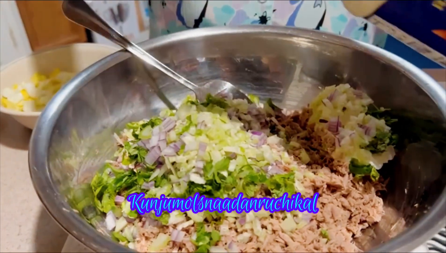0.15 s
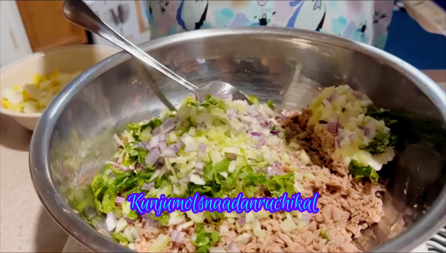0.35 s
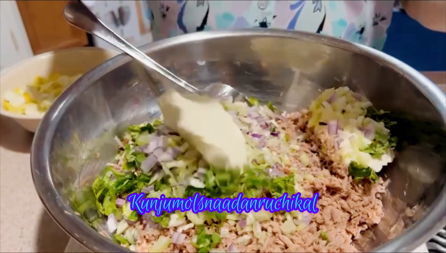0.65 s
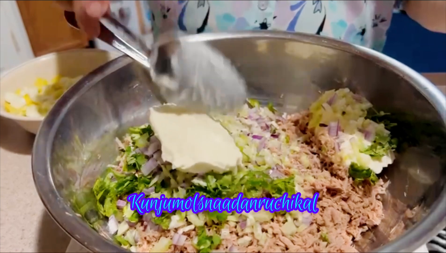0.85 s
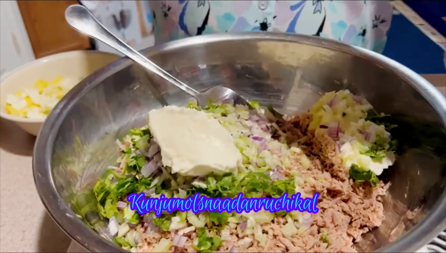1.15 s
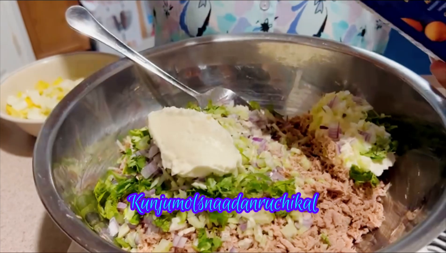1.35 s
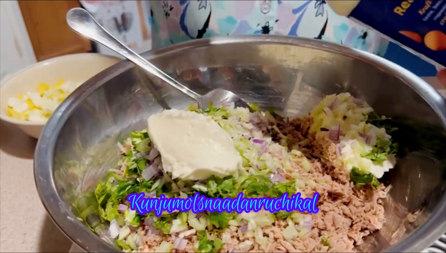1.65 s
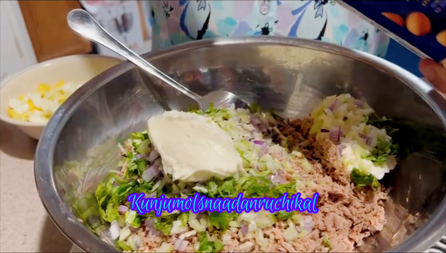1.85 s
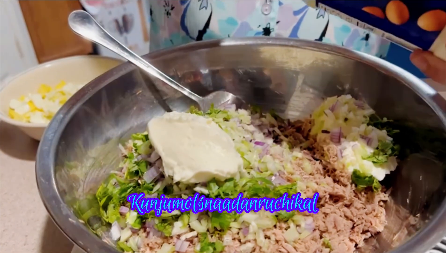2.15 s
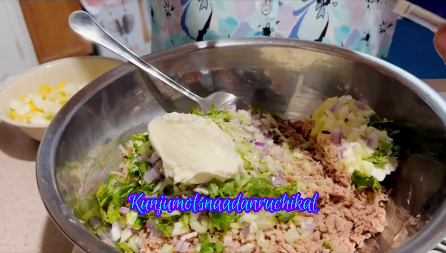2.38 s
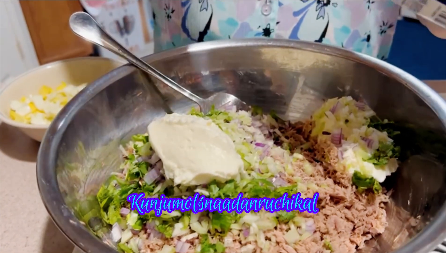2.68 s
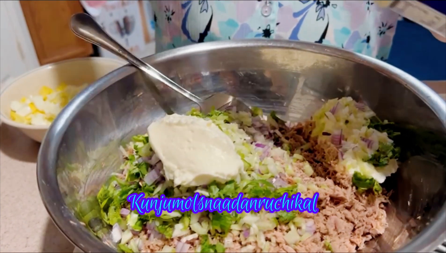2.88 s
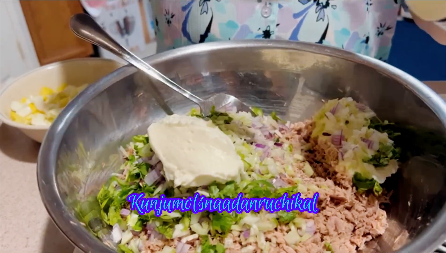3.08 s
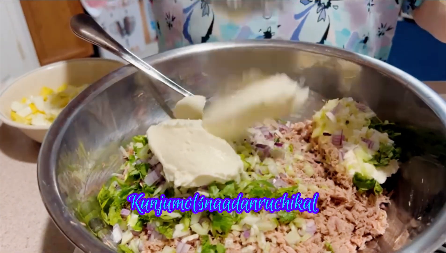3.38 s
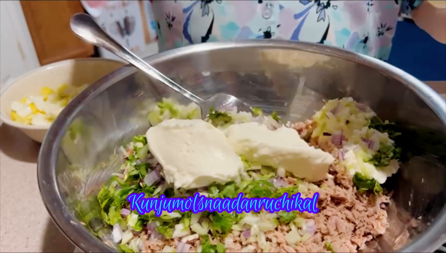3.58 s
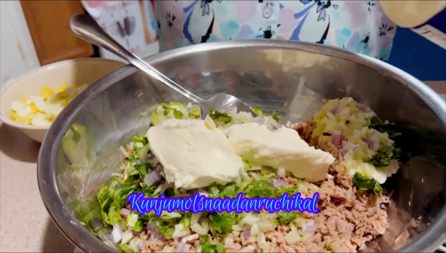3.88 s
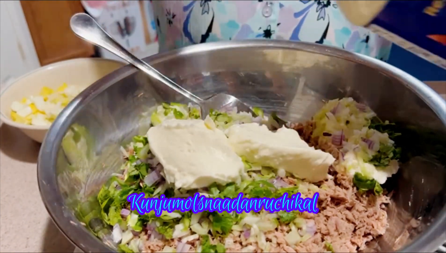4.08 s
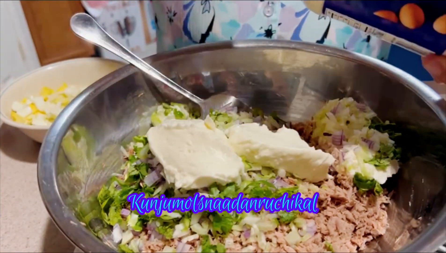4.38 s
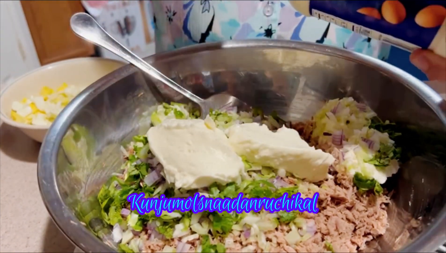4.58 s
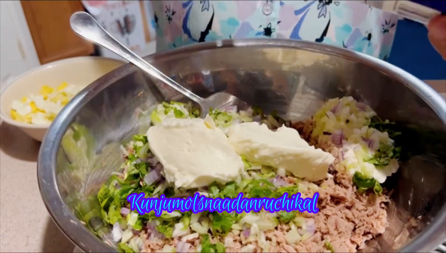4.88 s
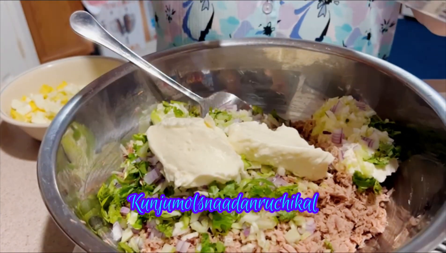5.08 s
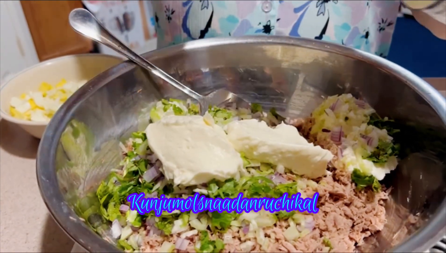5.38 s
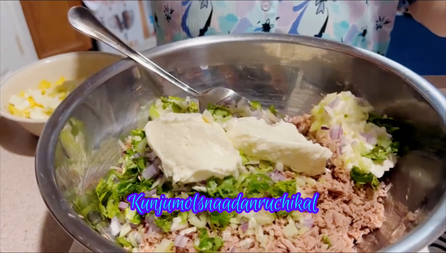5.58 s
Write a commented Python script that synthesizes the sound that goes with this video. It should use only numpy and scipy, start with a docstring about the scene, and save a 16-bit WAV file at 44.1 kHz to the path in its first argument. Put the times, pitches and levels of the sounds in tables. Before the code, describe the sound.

A squeezed plastic bottle, heard close and slightly to the right, gives sharp hollow snaps, dry crease ticks and soft finger rubbing. The strongest pops come early, a dense crackle follows, the middle is sparse, and a late cluster mixes small knocks with a short stick-slip squeak. Underneath is a constant wavering low hum with dull air noise; the small room adds only a short, faint diffuse tail.

```python
"""An appliance hums in a quiet kitchen and a spoon clinks once, faintly; then a plastic bottle is squeezed at the right.
Its walls buckle with hollow pops (noise snaps plus damped modes), a steel bowl rings faintly along with two of them,
and creases let go in dry ticks (coloured noise bursts). Fingers, brushes of sauce and a late stick-slip slide are
grainy noise, some of it sent through resonances. The hum is narrow noise bands and a wavering tone over uneven air
noise; the room answers with diffuse, fading noise."""
import sys
import numpy as np
from scipy import signal
from scipy.fft import rfft, irfft, next_fast_len
from scipy.io import wavfile
from scipy.ndimage import uniform_filter1d, map_coordinates

SR = 44100
rng = np.random.default_rng(int(sys.argv[2]) if len(sys.argv) > 2 else 0)


def wav_out(sig):
    """Save sig, one row per channel (or a flat mono array), as 16-bit PCM at SR to the path in sys.argv[1]."""
    wavfile.write(sys.argv[1], SR, np.round(np.clip(np.atleast_2d(sig).T, -1, 1) * 32767).astype(np.int16))


def undo_db(level):
    """Turn decibels back into plain size, where 20 dB means ten times bigger."""
    steps = np.asarray(level, float) / 20
    return 10 ** steps


N = 253114  # length [samples]

# wall buckling with a hollow ring; the two rows above 2 kHz are a steel bowl ringing faintly along:
# (start [s], snap peak [dB], ring pitch [Hz], ring over the snap before a common lift [dB],
# time until the ring is smothered [ms])
POPS = [(1.2261, -14, 564.6, -5.5, 19.4), (1.2268, -38.5, 1085, 16.5, 6.5), (1.2265, -37.5, 724, 9, 9),
        (1.228, -58, 2186, 3.5, 86), (1.3542, -63, 2120, 10, 84), (1.354, -16, 570, -17.5, 33),
        (1.36, -60, 572, 17, 40), (1.51, -59.5, 571, 11.5, 31), (1.8707, -20.5, 602, -18.5, 19),
        (2.07, -36, 1040, -9, 3), (2.1462, -40, 545, -0.5, 5.6), (2.2428, -37, 510, 3.5, 5),
        (2.243, -55, 896, 20.5, 3), (4.056, -29, 500, 1.5, 6), (4.058, -48.5, 326, 21.5, 3.8),
        (4.605, -41, 499, -2.5, 12), (4.6062, -48.5, 1550, 4.5, 9), (4.631, -38, 1550, 0, 3.1),
        (4.6696, -34.5, 698, 0.5, 4.9), (4.705, -34, 527, -3, 8.2), (4.765, -43.5, 1480, 6.5, 4.1),
        (5.0484, -54, 890, 8, 5.6), (5.1036, -30.5, 287, 2.5, 11.7), (5.104, -57, 1550, 20.5, 5.5),
        (5.2899, -25, 401, -19, 30), (5.295, -43.5, 940, 1.5, 4.2)]
# slacker and stiffer parts of the bottle: (pitch [Hz], relative level [dB], t60 [s])
OVERTONES = [(129, -8, 0.05), (720, -2, 0.033), (1085, 3, .022), (1300, 0.5, 0.029)]
# dry ticks of creases: (time [s], peak [dB], centre [Hz], narrowness [dB per squared octave])
TICKS = [(0.4529, -46.5, 2980, 29), (0.475, -46, 5000, 27), (0.595, -54, 4530, 1.1), (1.227, -16, 4440, 15),
         (1.229, -36, 6000, 8), (1.3548, -26, 6760, 19), (1.431, -43, 6150, 8.5), (1.5911, -48.5, 3300, 7),
         (1.6815, -51.5, 6960, 20), (2.0194, -44.5, 9150, 68), (2.0215, -52.5, 1300, 4.7),
         (2.0712, -32.5, 5000, 2.7), (2.068, -49, 1560, 13), (2.087, -47, 4800, 1.5),
         (2.088, -56, 2000, 30), (2.107, -38, 4000, 0.33), (2.12, -47, 2100, 1.1), (2.126, -41.5, 1100, 8),
         (2.135, -49, 700, 6.7), (2.1435, -54, 1890, 8), (2.16, -41, 1100, 4.9), (2.173, -48, 1460, 89),
         (2.174, -54, 5600, 9.6), (2.148, -55, 2000, 2.5), (2.21, -71, 2700, 8), (2.228, -56, 2200, 5.5),
         (2.236, -52, 1600, 6.4), (2.2448, -34, 1500, 0.54), (2.247, -44, 1200, 1.5),
         (2.2535, -36, 780, 9.7), (2.264, -44, 750, 9), (2.277, -61, 1300, 9.2), (2.292, -49, 1350, 23),
         (2.309, -49, 1790, 5.3), (2.326, -51.5, 1300, 8.2), (2.341, -55, 2000, 7.8),
         (2.318, -45, 2510, 0.71), (2.3745, -51, 5560, 31), (2.487, -52, 1710, 44),
         (2.5367, -59, 2570, 1.9), (3.2535, -41, 1740, 4), (3.2535, -41.5, 10100, 46),
         (3.271, -56, 8750, 16), (3.262, -50, 6020, 0.92), (3.285, -54, 7000, 2), (3.384, -54, 2730, 44),
         (3.384, -57.5, 6400, 35), (3.68, -47, 4220, 0.72), (3.689, -46.5, 3540, 1.2),
         (4.3135, -58, 8000, 25), (4.357, -54, 8700, 70), (4.3725, -49, 10600, 76), (4.373, -50.5, 1700, 9),
         (4.394, -56.5, 9600, 35), (4.41, -55.5, 1950, 43), (4.4288, -58, 8450, 65), (4.457, -55, 9000, 11),
         (4.4663, -44, 8400, 62), (4.467, -51, 2500, 1.3), (4.623, -43, 2500, 0.67),
         (4.645, -53, 1500, 5.5), (4.692, -42, 2200, 1.8), (4.78, -53, 1800, 3.3), (4.845, -54, 4550, 3),
         (4.87, -46, 6400, 3.5), (5.01, -51, 1400, 13), (5.032, -50, 1400, 19), (5.1045, -22, 3200, 1.14),
         (5.2043, -54, 3500, 3.5), (5.232, -46, 950, 13), (5.247, -42, 1600, 14), (5.5228, -47, 560, 12),
         (5.528, -44, 500, 12)]
# colour of a burst in the plastic: (frequency [Hz], relative density [dB per Hz])
PLASTIC_COLOUR = [(150, -38.5), (400, 2.5), (1200, -9), (1600, -9), (2000, -11), (2800, -14), (4000, -17.5),
                  (5200, -19), (6600, -15), (8200, -17), (10400, -27), (11800, -31.5), (12600, -37),
                  (16000, -71)]
# resonances of the bottle's wall: (centre [Hz], width per pass [Hz], relative level [dB])
WALL = [(571, 340, -0.5), (890, 200, -5.5), (1320, 200, -8), (1950, 1100, -10), (2335, 74, -15.5),
        (3100, 130, -18)]
# the bottle slides slowly through the hand, which damps first its neck, later its belly:
# (time [s], level [dB], share of the neck [0-1])
SLIDE = [(4.72, -60, .1), (4.78, -63, 0.15), (4.83, -60.5, 0.17), (4.87, -57.5, 0.05), (4.95, -54, 0),
         (4.99, -62, 0.3), (5.03, -60.5, 0.81), (5.1, -55, 0.9), (5.2, -70, 0.8), (5.35, -69.5, 0.6)]
# resonances of the bottle's belly: (centre [Hz], width per pass [Hz], relative level [dB])
BELLY = [(478, 40, 7), (590, 41, -6.5), (700, 100, -8), (930, 60, -14.5), (1369, 50, -9.5),
         (1500, 80, -12.5), (2200, 1200, -29), (3300, 150, -20), (4270, 110, -25), (5310, 230, -32)]
# resonances of the bottle's neck: (centre [Hz], width per pass [Hz], relative level [dB])
NECK = [(432, 40, 7.5), (935, 70, -4), (1400, 45, 4), (1400, 68, -2.5), (1550, 90, -10), (1950, 300, -10),
        (2446, 280, -16.5), (3300, 180, -19), (4170, 130, -20.5)]
# pressure of the hand on the wall: (time [s], rub level [dB])
GRIP = [(0.0, -64), (0.21, -85), (0.86, -80.5), (1.18, -75), (1.28, -53.5), (1.39, -60.5), (1.53, -62.5),
        (1.69, -69.5), (1.92, -86), (2.09, -61), (2.22, -64.5), (2.54, -75.5), (3.16, -83), (3.49, -71),
        (3.74, -82), (4.65, -71.5), (5.12, -62.5), (5.21, -67), (5.48, -76), (5.74, -81)]
# skin lets go and slides: (time of the crest [s], level [dB], fade [dB per s])
SLIPS = [(0.0, -85, 81), (1.39, -75, 59), (1.968, -73, 85), (2.091, -62.5, 56), (4.652, -74.5, 29)]
# colour of skin on plastic: (frequency [Hz], relative density [dB per Hz])
SKIN_COLOUR = [(1180, -28.5), (2000, -4.5), (2260, -10.5), (3930, -19.5), (8550, -6.5), (11700, -24.5),
               (12600, -54.5), (16300, -74), (22000, -120)]
# soft brushes of sauce and fingers: (middle [s], rms before the swell [dB], length [ms],
# centre [Hz], narrowness [dB per squared octave])
BRUSHES = [(0.471, -59, 63, 3820, 0.8), (0.607, -65.5, 57, 6000, 0.42), (0.92, -90, 210, 1830, 33),
           (1.0, -72, 760, 940, 4.4), (1.11, -76, 320, 2200, 76), (1.46, -67.5, 130, 3940, 1.5),
           (1.645, -62.5, 46, 3220, 3.9), (1.97, -66, 34, 6040, 10), (2.3, -56, 190, 590, 14),
           (3.427, -73, 75, 7000, 0.43), (3.425, -71.5, 110, 1500, 5), (3.5, -75, 880, 1660, 19),
           (3.563, -65.5, 34, 8030, 32), (3.694, -61, 12, 5000, 0.48), (4.084, -73, 160, 2270, 11),
           (4.484, -74, 77, 8900, 73), (4.884, -66, 45, 8600, 22), (4.999, -75.5, 130, 7100, 5.5),
           (5.16, -63.5, 200, 1700, 1.2), (5.236, -54, 27, 1500, 1.24), (5.25, -53.5, 19, 1300, 1.3),
           (5.34, -62.5, 38, 3900, 7.3)]
# modes of the touched steel: (pitch [Hz], relative level [dB], t60 [s])
SPOON_MODES = [(2040, -13, 0.18), (3200, -6, 0.14), (3900, -9.5, 0.037), (5640, -19.5, 0.096),
               (7000, -17, 0.092), (8000, -18, 0.17)]
# the spoon's one touch: (time [s], level [dB])
CLINK = (.077, -57)
# the left port hears the bottle duller and later: (frequency [Hz], left over right [dB], left lag [radians])
SHADE = [(120, -1.5, .02), (300, -0.5, 0.2), (390, -2.5, 0.24), (460, -6.5, 0.6), (545, -1.5, 0.3),
         (750, -1, 0.4), (1093, -2, 1), (1500, -5.5, 1.2), (2830, -3.5, 1.5), (5000, -7, 0.4),
         (8000, -2, 1.9), (11650, 0.3, 0.72)]
# what the kitchen returns: (frequency [Hz], relative level [dB])
ROOM_COLOUR = [(300, 5), (570, -0.5), (1200, 1), (1600, -0.5), (2100, 2), (4500, -1), (10000, -4)]
# how long the kitchen lingers: (frequency [Hz], t60 [s])
KITCHEN_DECAY = [(250, 0.25), (560, 0.2), (1000, 0.3), (4000, 0.34), (6500, 0.34), (10000, 0.2)]
# the appliance's steady tone: (pitch [Hz], nominal rms [dB])
MOTOR = (117.8, -51)
# the appliance's noise bands: (centre [Hz], width per pass [Hz], rms [dB])
HUM = [(51.87, 21, -59.5), (119, 12, -63.5), (155.9, 2.8, -62.5), (200.1, 9.7, -54.5), (237, 16, -65.5),
       (299.5, 22, -73.5), (532.4, 14, -73)]
# colour of the room's air noise: (frequency [Hz], relative density [dB per Hz])
AIR_COLOUR = [(13, -54.5), (22, -19), (69, -5), (105, -7), (157, -12), (205, -3.5), (253, -21), (313, -18),
              (533, -27.5), (906, -31), (1090, -38.5), (1280, -35), (3070, -57), (7190, -57.5),
              (12600, -68.5), (16300, -104), (22000, -120)]
# how alike the background is at both ports: (frequency [Hz], left-right correlation [-1 to 1])
ALIKE = [(60, 0.997), (200, .98), (320, .92), (500, 0.45), (1100, 0.05), (1600, 0.05), (2300, .5),
         (4190, 0.42), (12100, 0.4)]
# treble colour of the finished mix: (frequency [Hz], gain [dB])
TREBLE_COLOUR = [(9600, -2.5), (9900, -12.5), (10900, -14.5), (11200, 2.5), (11900, -4), (12300, -20)]


def unit(x):
    """Scale to rms 1."""
    return x / np.sqrt(np.mean(x ** 2) + 1e-20)


def along(points, hz):
    """Read (Hz, value) points on a log frequency axis."""
    f, v = np.transpose(points)
    return np.interp(np.log(hz + 1), np.log(f + 1), v)


def wobble(rate):
    """A smooth random curve with this many knots a second."""
    knots = rng.standard_normal(int(N * rate / SR) + 4)
    return map_coordinates(knots, [np.arange(N) * rate / SR])


def filtered(x, response):
    """Multiply the spectrum of x by a complex response of frequency."""
    m = next_fast_len(x.shape[-1] + 8192)
    spectrum = rfft(x, m) * response(np.fft.rfftfreq(m, 1 / SR))
    return irfft(spectrum, m)[..., :x.shape[-1]]


def peak(f, hz, width):
    """The response of one causal resonance."""
    return 1j * f * width / (hz * hz - f * f + 1j * f * width)


def through(x, resonances):
    """Excitation heard through a set of resonances, each passed twice; rms 1."""
    return unit(filtered(x, lambda f: sum(undo_db(db) * peak(f, hz, w) ** 2 for hz, w, db in resonances)))


def around(hz, narrow):
    """A colour in dB falling away on both sides of a centre."""
    return lambda f: -narrow * np.log2(f / hz) ** 2


def tinted(burst, colour_db):
    """Noise coloured by the plastic and by the contact's own colour, a function of Hz."""
    return filtered(burst, lambda f: undo_db(along(PLASTIC_COLOUR, f) + colour_db(np.clip(f, 250, 12000))))


def add(track, s, sound):
    """Mix a sound into a track at a time in seconds."""
    start = round(s * SR)
    track[start:start + len(sound)] += sound


def snap(colour_db, length_ms):
    """One sharp step, with noise dying by 60 dB over the length (at least 3 ms); peak 1."""
    ms = np.arange(SR // 10) / SR * 1000
    burst = undo_db(-60 * ms / max(length_ms, 3)) * rng.standard_normal(len(ms))
    burst[8] = -undo_db(12.5)  # the step stands above the noise
    burst = tinted(np.roll(burst, 40), colour_db)
    return burst / np.abs(burst).max()


def ring(hz, t60, rise_ms):
    """A damped mode with a soft start."""
    t = np.arange(SR // 5) / SR
    return undo_db(-60 * t / t60) * (1 - np.exp(-1000 * t / rise_ms)) * np.sin(2 * np.pi * hz * t)


def grip_db(t):
    """The hand's pressure at given times, as a rub level in dB."""
    return np.interp(t, *np.transpose(GRIP))


def pops():
    """A wall snaps through and its panel rings until the hand smothers it; twice a steel bowl rings along."""
    out, ms = np.zeros(N + SR), np.arange(SR // 5) / SR * 1000
    for s, db, hz, ring_db, ring_ms in POPS:
        # a harder snap is brighter [dB per octave]
        bright = -0.12 + 0.045 * (db + 34.0)
        add(out, s, undo_db(db) * snap(lambda f: bright * np.log2(f / 4000), 18))

        hollow = ring(hz, 0.25, 4.1) * np.exp(-(ms / ring_ms) ** 3)
        add(out, s + 0.0016, undo_db(db + ring_db + 5.5) * hollow)

        # overtones follow the ring, weaken at a pitch under 560 Hz and fill out with a harder snap
        slack_db = 7 * min(np.log2(hz / 560), 0)
        over_db = -7 + 0.78 * ring_db + slack_db + 0.17 * (db + 35.0)
        overtones = sum(undo_db(level + 2 * rng.standard_normal()) * ring(f, t60, 0.87)
                        for f, level, t60 in OVERTONES)
        add(out, s + 0.00083, undo_db(db + over_db) * overtones)

        # the rest of the wall shakes roughly
        shudder = through(rng.standard_normal(len(ms)), WALL) * undo_db(-60 * ms / 70)
        add(out, s + 0.001045, undo_db(db + (ring_db + over_db) / 2 - 10.0) * shudder)
    return out[:N]


def ticks():
    """Creases let go without ringing the wall; small ones fall at random, louder under more pressure."""
    out, count = np.zeros(N + SR), 40
    when = rng.random(count) * N / SR
    size, pitch = rng.standard_normal((2, count))
    small_db = grip_db(when) + 2.5 + 2.5 * size  # over the grip level, scattered
    small_hz = 2500 * np.exp(0.4 * pitch)
    small = zip(when + 0.002, small_db, small_hz, np.full(count, 2.5))
    for s, db, hz, narrow in [*TICKS, *small]:
        length_ms = 17 * (4000 / hz) ** 0.2  # lower creases last longer
        add(out, s - 0.001, undo_db(db) * snap(around(hz, narrow), length_ms))
    return out[:N]


def slide():
    """Uneven stick-slip jerks over a smooth drag sing in the hollow body."""
    jerks_per_s, scatter_db, drag_db = 270, 3.5, -3.5
    s, db, neck_share = np.transpose(SLIDE)
    t = np.arange(N) / SR
    share = np.clip(np.interp(t, s, neck_share), 0, 1)
    chance, size = rng.random(N), rng.standard_normal(N)
    jerks = unit((chance < jerks_per_s / SR) * undo_db(scatter_db * size))
    rub = jerks + undo_db(drag_db) * rng.standard_normal(N)
    sung = np.sqrt(1 - share) * through(rub, BELLY) + np.sqrt(share) * through(rub, NECK)
    return undo_db(np.interp(t, s, db, -120, -120)) * sung


def fingers():
    """Skin slips over plastic in clumps of grains and drags the wall's resonances."""
    rise_db_per_s, rest_db, lift_s = 399, -91, 4.8  # slip onset, hiss of the resting hand, fingers come off
    t = np.arange(N) / SR
    slips = sum(undo_db(db - np.maximum(rise_db_per_s * (s - t), fade * (t - s))) for s, db, fade in SLIPS)
    lifted = undo_db(-rise_db_per_s * np.maximum(t - lift_s, 0))
    skin_level = undo_db(rest_db) + slips * lifted

    clumps_db = 2.5 * wobble(60)
    grains = rng.standard_normal(N) * undo_db(4.5 * wobble(400) + clumps_db)
    skin = unit(filtered(grains, lambda f: undo_db(along(SKIN_COLOUR, f))))
    wall = through(rng.standard_normal(N) * undo_db(clumps_db + 4 * wobble(150)), WALL)
    return skin_level * skin + undo_db(grip_db(t)) * wall


def brushes():
    """Sauce and fingers brush the plastic in grainy puffs that swell and fade."""
    margin = SR // 4  # half a puff's window [samples]
    out, grain = np.zeros(N + 2 * SR), undo_db(3.4 * wobble(270))
    t = np.arange(-margin, margin) / SR
    for s, db, length_ms, hz, narrow in BRUSHES:
        puff = unit(tinted(rng.standard_normal(len(t)) * np.roll(grain, -round(s * SR))[:len(t)],
                           around(hz, narrow)))
        rise = np.where(t < 0, 0.99, 1)  # the swell is slightly quicker than the fade
        swell = np.exp(-(t * 2500 / length_ms / rise) ** 2)
        add(out, s, undo_db(db) * puff * swell)
    return out[margin:][:N]  # puts each middle at its listed time


def spoon():
    """A faint touch of steel on steel: a few damped modes."""
    out = np.zeros(N)
    s, level_db = CLINK
    add(out, s, undo_db(level_db) * sum(undo_db(db) * ring(hz, t60, 0.6) for hz, db, t60 in SPOON_MODES))
    return out


def ports(x):
    """Sound from the right: the left port hears it duller and later, half the contrast on each side."""
    hz, db, lag = np.transpose(SHADE)

    def half(f):
        level = undo_db(along(list(zip(hz, db)), f) / 2)
        return level * np.exp(-0.5j * along(list(zip(hz, lag)), f))

    return filtered(x, lambda f: np.array([half(f), 1 / half(f)]))


def room(x):
    """The energy in each band lingers, dies at its own speed and comes back as diffuse noise."""
    alike_hz = 380  # towards the bass the answer is the same at both ports
    delayed = np.pad(x, (440, 0))[:N]  # 10 ms
    hz, t, z = signal.stft(delayed, SR, nperseg=512)
    fade = undo_db(-120 * t[:85] / along(KITCHEN_DECAY, hz)[:, None])  # energy falls 60 dB in t60
    fade = fade / fade.sum(1, keepdims=True)
    energy = signal.fftconvolve(np.abs(z) ** 2, fade, axes=1)[:, :len(t)]
    chance = signal.stft(rng.standard_normal((2, N)), nperseg=512)[2]
    diffuse = chance / np.std(chance) * np.sqrt(np.abs(energy) / 2)
    mid, side = signal.istft(diffuse, nperseg=512)[1][:, :N]
    side = filtered(side, lambda f: f ** 4 / (f ** 4 + alike_hz ** 4))
    return np.array([mid + side, mid - side])


def motor():
    """The appliance's steady tone, wavering a little in pitch and strength."""
    hz, db = MOTOR
    phase = 2 * np.pi * np.cumsum(hz + 1.2 * wobble(4.5)) / SR
    waver_db = 1.8 * wobble(3)
    return np.sqrt(2) * undo_db(db + waver_db) * np.sin(phase)


def patchy(x):
    """Make a murmur uneven: small regions of pitch and time swell and sink."""
    z = signal.stft(x, nperseg=512)[2]
    field = uniform_filter1d(rng.standard_normal(z.shape[1:]), size=4, axis=0)
    field = uniform_filter1d(field, size=16, axis=1)
    return signal.istft(z * undo_db(1.8 * unit(field)), nperseg=512)[1][:, :N]


def hum():
    """Narrow wavering bands of an appliance over the room's air noise; bass alike at both ports."""
    def mid_side(shape):
        def response(f):
            # this split of mid and side gives the wanted left-right correlation
            angle = np.arccos(np.clip(along(ALIKE, f), -1, 0.999)) / 2
            return shape(f) * np.array([np.cos(angle), np.sin(angle)])
        return filtered(rng.standard_normal((2, N)), response)

    def left_right(ms):
        return unit(np.array([ms[0] + ms[1], ms[0] - ms[1]]))

    air = left_right(patchy(mid_side(lambda f: undo_db(along(AIR_COLOUR, f)))))
    bands = sum(undo_db(db) * left_right(mid_side(lambda f: peak(f, hz, width) ** 2)) for hz, width, db in HUM)
    return undo_db(-53) * air + bands


def scene():
    """The bottle, bowl and spoon in the kitchen, over the hum."""
    near = pops() + ticks() + brushes() + fingers() + slide() + spoon()
    returned = room(filtered(near, lambda f: undo_db(along(ROOM_COLOUR, f))))
    # level pairs are left and right [dB]
    return ports(near) + undo_db([[-13], [-11]]) * returned + hum() + undo_db([[0.6], [-0.6]]) * motor()


def low_pass(x):
    """Removes everything above the highest recorded frequency."""
    return signal.sosfilt(signal.butter(12, 12710, fs=SR, output="sos"), x)


def record(dry):
    """A treble colour shapes the finished mix."""
    mix = filtered(dry, lambda f: undo_db(along(TREBLE_COLOUR, f)))
    return low_pass(mix)


dry = scene()
out = record(dry)
wav_out(out)
```